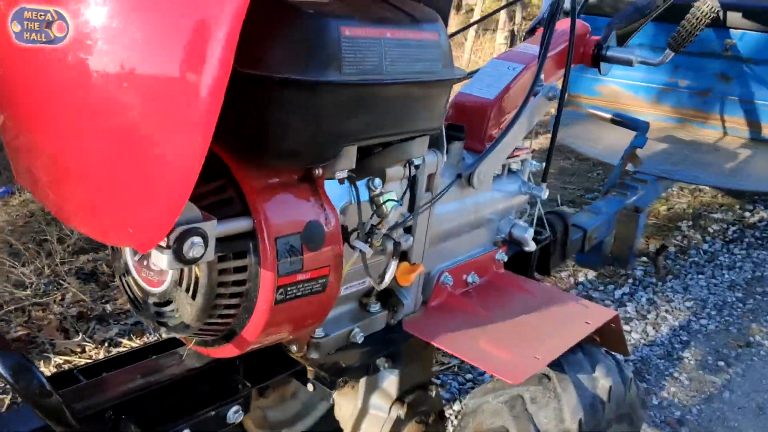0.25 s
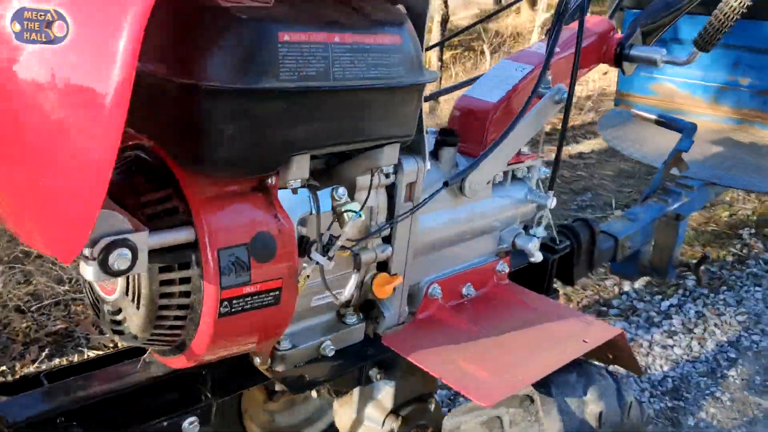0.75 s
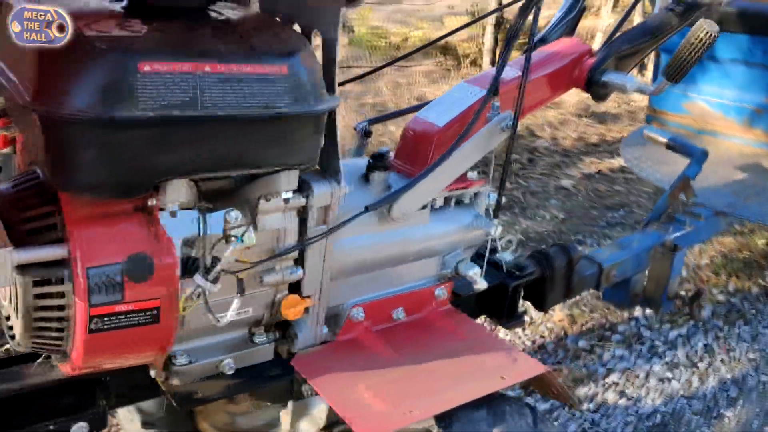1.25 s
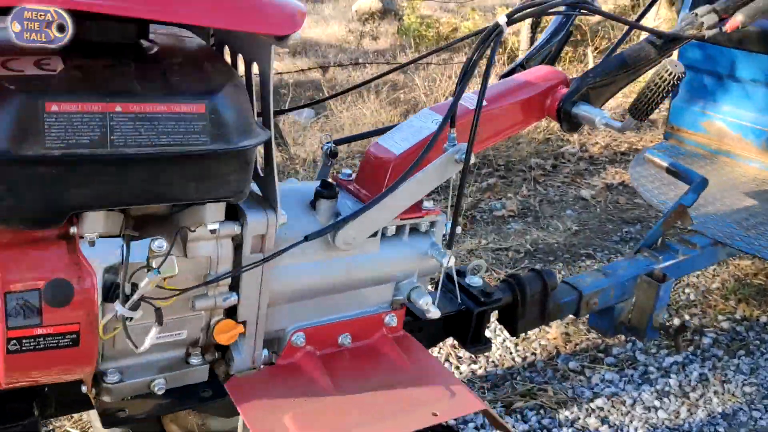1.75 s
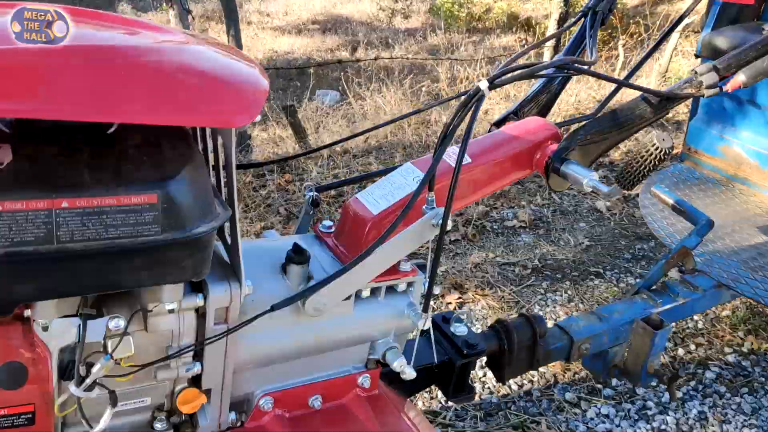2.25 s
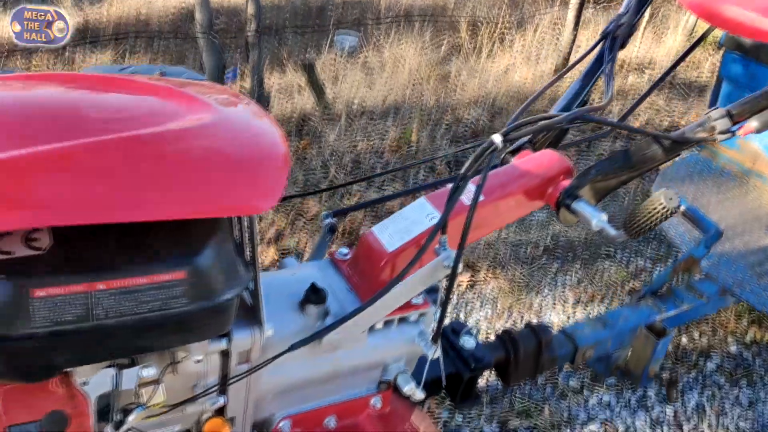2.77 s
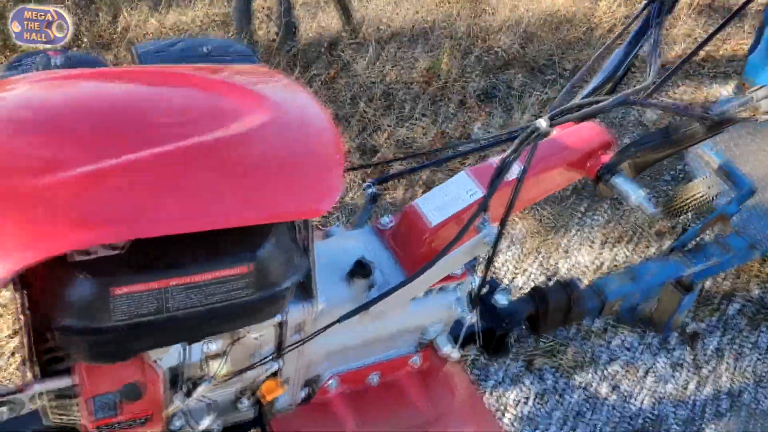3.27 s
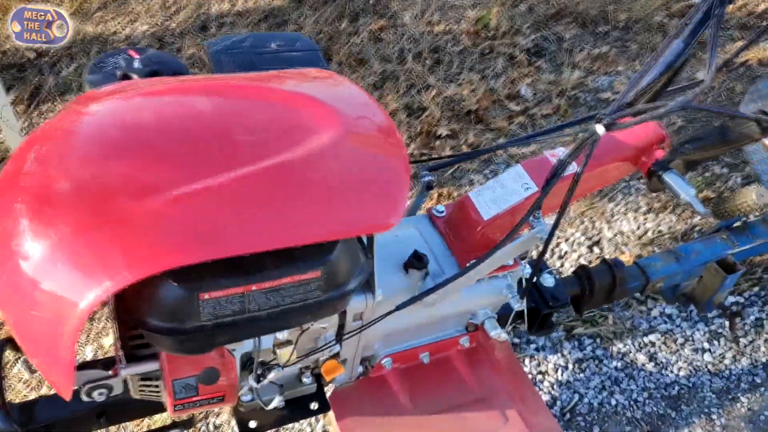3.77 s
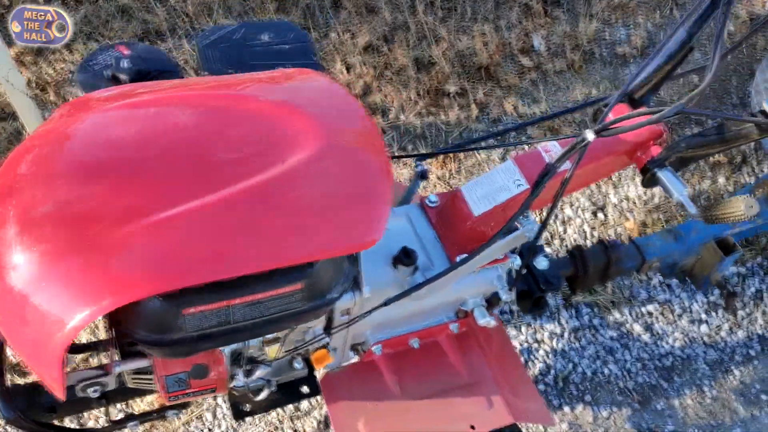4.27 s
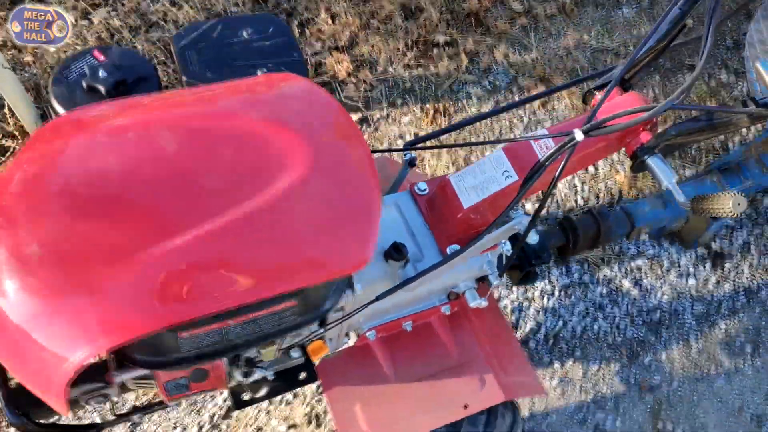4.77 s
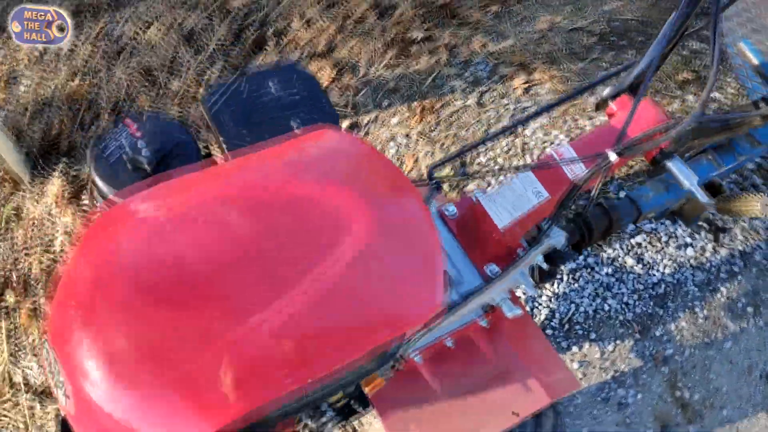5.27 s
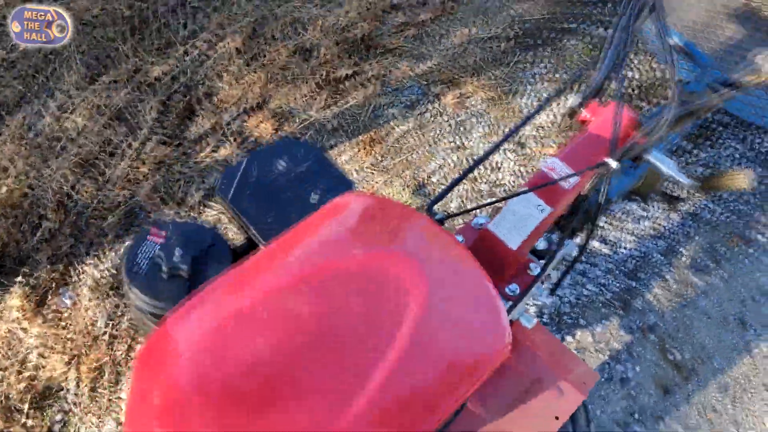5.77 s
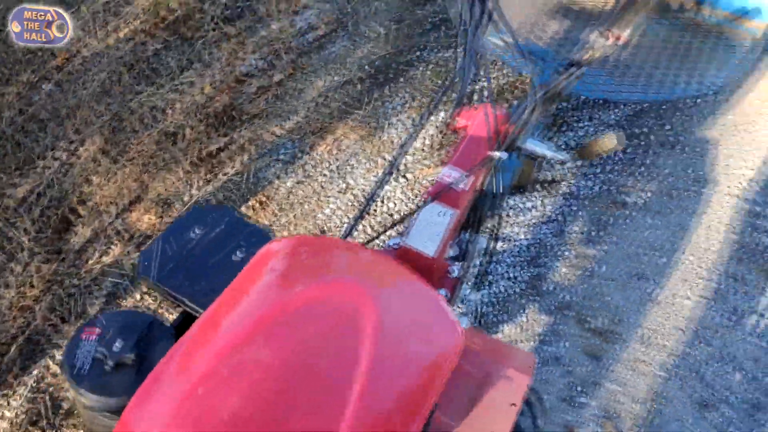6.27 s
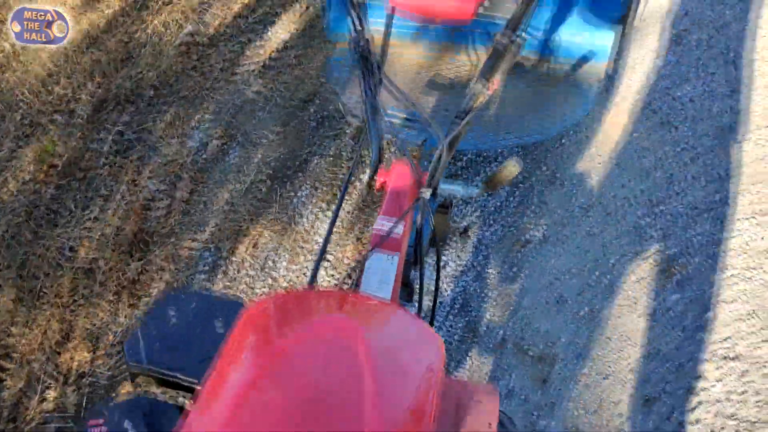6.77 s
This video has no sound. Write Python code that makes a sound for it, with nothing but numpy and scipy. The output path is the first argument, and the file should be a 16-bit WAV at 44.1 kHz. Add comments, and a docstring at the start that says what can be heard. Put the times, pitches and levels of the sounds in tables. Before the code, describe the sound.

Steady fast rattling drone of a single-cylinder engine, its tone shifting as the handheld microphone moves round, with sharp handling ticks, fading at the end.

```python
"""At a roadside, the single-cylinder petrol engine of a walking tiller runs while a hand-held microphone moves round it.
Every turn of the crank repeats a pattern of knocks and clatter, mixed with random rush and the fan's air.
Drone, clatter and fan are coloured by the side of the machine that the microphone faces.
Fingers bump, rub, tick, slide and squeak on the microphone's case: damped swings, short rings and filtered noise.
A light breeze rumbles in its two ports as slow, uneven noise."""
import sys
import numpy as np
from scipy import signal
from scipy.fft import rfft, irfft
from scipy.io import wavfile
from scipy.ndimage import uniform_filter1d, map_coordinates

SR = 44100
rng = np.random.default_rng(int(sys.argv[2]) if len(sys.argv) > 2 else 0)


def materialize(psi):
    """Save the field psi as 16-bit PCM at rate SR to the path in sys.argv[1].

    A 1-D psi becomes a single channel; in a 2-D psi each row is a channel.
    """
    bounded = np.clip(np.atleast_2d(psi).T, -1, 1)
    quanta = np.round(bounded * 32767).astype(np.int16)
    wavfile.write(sys.argv[1], SR, quanta)


N = 309582
TIME = np.arange(N) / SR
PORT_LAG_S = 0.0003633   # shared sound reaches the left port this much later

# speed of the crank before its small wavering: (time [s], speed [turns per s])
CRANK_SPEED = [(0, 69.0), (.5, 68.78), (1.2, 68.94), (2, 69.12), (2.3, 68.72), (2.65, 69.1), (3.6, 69.13),
               (4.2, 69.04), (4.55, 69.17), (5.3, 69.04), (5.9, 68.87), (7.02, 69.05)]
# pitch of the cowl's ring before it wavers: (time [s], frequency [Hz])
COWL_PITCH = [(0, 2627), (.3, 2750), (.7, 2665), (1.4, 2756), (2.3, 2460), (3.0, 2408), (4.4, 2300),
              (6.0, 2290)]
COWL_WAVER_HZ, COWL_WAVERS_PER_S = 35, 14
CHIME_AT = .21   # when the cowl's chime peaks [share of a turn]


def from_db(db):
    """Decibels to gain."""
    return 10 ** (np.asarray(db) / 20)


def read_curve(rows, x):
    """Read a two-column curve at x, with straight lines between its points."""
    return np.interp(x, *np.transpose(rows))


def in_time(rows):
    """Read a curve over time, sample by sample."""
    return read_curve(rows, TIME)


def at_hz(points, hz):
    """Gain of a spectrum at the given frequencies, with straight lines over log frequency."""
    f, db = np.transpose(points)
    return from_db(np.interp(np.log(hz + 1e-9), np.log(f), db))


def rms_one(x):
    """Scale a stereo pair so that the average of its two sides has rms 1."""
    middle = x.mean(axis=0)
    return x / np.sqrt(np.mean(middle ** 2) + 1e-20)


def panned(pan_db):
    """Left and right gains of constant power; a positive value makes the left louder."""
    gains = from_db(np.array([pan_db, -pan_db]).reshape(2, -1) / 2)
    return gains / np.sqrt(np.mean(gains ** 2, axis=0))


def drift(rate):
    """Slow random wandering: straight lines between chance values of spread 1, `rate` of them a second."""
    knots = rng.standard_normal(int(N / SR * rate) + 2)
    return np.interp(TIME * rate, np.arange(len(knots)), knots)


def white():
    """Unrelated noise for each side."""
    return rng.standard_normal((2, N))


def shaped(x, colour, low_hz, high_hz, alike):
    """Colour and band-limit a pair; the part that both ports share reaches the left one later."""
    hz = np.fft.rfftfreq(N, 1 / SR) + 1e-3
    edges = 1 / np.sqrt((1 + (low_hz / hz) ** 20) * (1 + (hz / high_hz) ** 20))
    first, second = rfft(x) * edges * at_hz(colour, hz)
    alike = np.clip(alike, 0, 1)
    left = first * np.exp(-2j * np.pi * hz * PORT_LAG_S)
    right = alike * first + np.sqrt(1 - alike ** 2) * second
    return rms_one(irfft([left, right], N))


def blend(tone, rush, share):
    """Mix two sounds; `share` is the first one's part of the power."""
    share = np.clip(share, 0, 1)
    return np.sqrt(share) * tone + np.sqrt(1 - share) * rush


def narrow_ring(centre_hz, width_hz):
    """Noise in a resonance whose centre moves: slow noise carried up to the moving pitch."""
    lowpass = signal.butter(2, width_hz / 2, fs=SR, output="sos")
    slow = signal.sosfilt(lowpass, white() + 1j * white())
    carrier = np.exp(2j * np.pi * np.cumsum(centre_hz) / SR)
    return rms_one((slow * carrier).real)


def add(out, s, sound, pan_db):
    """Place a short sound at time s; the louder side gets its full height."""
    start = round(s * SR)
    sides = panned(pan_db)
    out[:, start:start + len(sound)] += (sides / sides.max() * sound)[:, :N - start]


def engine():
    """Drone, clatter and fan: the crank's angle times their repeating parts and their puffs."""
    # how clearly the buzz stands out of the rush: (time [s], repeating share of the power [0-1])
    clearness = [(.25, .25), (.5, .84), (1.85, .84), (2.12, .28), (2.36, .36), (2.58, .8), (4.05, .78),
                 (4.4, .74), (4.8, .86), (6.36, .85), (6.62, .2)]
    # clatter, which comes and goes as the cowl hides and bares the engine: (time [s], level [dB])
    clatter_level = [(0.0, -40.5), (0.39, -43.5), (0.62, -38), (0.9, -43.5), (1.04, -37.5), (1.72, -41),
                     (1.9, -49), (1.99, -39), (2.13, -51), (2.25, -44), (2.27, -50), (2.34, -39.5),
                     (3.28, -39.5), (3.64, -44), (3.93, -42.5), (4.07, -45.5), (4.21, -43), (4.36, -41.5),
                     (4.59, -50), (4.79, -42), (5.08, -50), (5.24, -46), (5.41, -48), (5.7, -43.5),
                     (6.05, -40), (6.32, -42), (6.47, -53), (6.61, -50), (6.7, -59), (7.02, -56)]
    # walk round the machine: (time [s], position [0 at the flank, 1 before the cowl, 2 above it])
    walk = [(0, 1.2), (1.0, 0.27), (1.85, 0.14), (2.45, 0.75), (3.5, 0.98), (4.9, 1.4), (5.4, 1.49),
            (5.8, 1.87), (7.02, 1.24)]
    # the pitch wavers more where the buzz is unclear: (clearness [0-1], spread [share of the speed])
    waver_spread = [(.25, .009), (.75, .0003)]
    open_db = -39    # clatter with the engine in plain view
    swell_s = 0.64   # swings of the clatter quicker than this carry the drone along

    speed, clear = in_time(CRANK_SPEED), in_time(clearness)
    clatter_db, position = in_time(clatter_level), in_time(walk)
    waver = read_curve(waver_spread, clear) * drift(9)
    turns = np.cumsum(speed * (1 + 0.00077 * drift(25) + waver)) / SR
    puffs = knocking(turns, decay=0.14, rest=0.3)
    high = buzz(turns, position, alike=.6, steady=1.1, half_db=-12)
    swell_db = clatter_db - uniform_filter1d(clatter_db, size=int(swell_s * SR))
    sound = drone(turns, position, puffs, clear, swell_db)
    sound = sound + clatter(high, turns, puffs, clear, clatter_db, position)
    sound = sound + fan(high, puffs, clear, clatter_db - open_db, position)
    return walk_round(sound, position)


def knocking(angle, decay, rest):
    """Strength of the rattle round one turn: each knock jumps up, then dies away [decay: share of a turn]."""
    # knocks within one turn: (moment [share of the turn], level [dB])
    knock_rows = [(.2, -8), (.46, -10.5), (.7, -11), (.9, -9.5)]
    strength = rest + sum(from_db(db) * np.exp(-((angle - at) % 1) / decay) for at, db in knock_rows)
    return strength / np.sqrt(np.mean(strength ** 2))


def buzz(turns, position, alike, steady, half_db, size=4096, count=22):
    """A rattle repeats every two turns; its fine pattern slowly changes, and some lines depend on position."""
    # lines of the engine: (multiple of crank speed, level [dB])
    line_rows = [(2, -16.5), (3, -15.5), (4, -34), (5, -11), (6, -6.5), (7, -14.5), (8, -13), (9, -17.5),
                 (10, -10), (11, -10), (12, -10.5), (13, -7.5), (14, -3.5), (15, -6.5), (16, -11),
                 (17, -11), (18, -6), (19, 0), (20, 0.5), (21, -3.5), (22, -1.5), (23, -9), (24, -10),
                 (25, -4.5), (26, -4), (27, -3.5), (28, 1), (29, 1.5), (30, 0), (31, -6.5), (32, 1.5),
                 (33, 1.5), (34, -3), (35, 2.5), (36, -3), (37, -0.5), (38, 0), (39, -1), (40, -2),
                 (41, -3), (42, -5.5), (43, -1.5), (44, -9), (45, -13), (46, -6.5), (47, -8), (48, -12),
                 (49, -8), (50, -9.0), (51, -8), (52, -20), (53, -19), (54, -13.5), (55, -8), (56, -13),
                 (57, -15)]
    # lines that beam towards one position or leave it in shadow: (multiple of crank speed, position, level [dB])
    beam_rows = [(3, 1.9, 5), (6, 1.92, 6.5), (9, 1.1, 5), (10, 0.3, 4), (10, 1.45, 4), (10, 2, -26),
                 (11, 0.75, 3), (11, .25, 4), (11, 2.1, -17), (12, 0.95, -5), (13, .5, 4), (13, 0.85, -6),
                 (16, 1.05, 4), (17, 1.65, 7), (19, .55, -4), (20, 1.48, -20), (21, 0.55, 4), (19, 1.2, -4),
                 (22, 0.45, -13), (24, 1.7, 3), (27, .4, 3), (29, 0.48, -10), (30, 1.85, 4), (31, 1.41, 11),
                 (31, 0.56, 3), (34, 1.77, 6), (34, .9, -4), (35, 1.7, -5.5), (36, 1.2, 4.5),
                 (38, 0.31, 4.5), (42, 1.8, 9), (43, 0.18, 2), (43, 0.94, -6.5), (44, 0.12, 4.5),
                 (45, 1.65, 7), (47, 0.43, -1.5), (48, 0.88, 11.5), (54, 0.29, 10), (57, 0.14, 10)]
    beam_width = .22   # spread in steps of position

    order = np.arange(size // 2 + 1) / 2   # a four-stroke cycle lasts two turns
    whole = order % 1 == 0
    multiple, line_db = np.transpose(line_rows)
    spots = position[np.linspace(0, N - 1, count).astype(int), None]
    beams_db = sum(db * (order == round(k)) * np.exp(-((spots - at) / beam_width) ** 2 / 2)
                   for k, at, db in beam_rows)
    lines = from_db(np.interp(order, multiple, line_db) + beams_db + half_db * ~whole)
    lines = lines * (order > 1) * (order < size / 16)
    above = np.maximum(order / multiple[-1], 1)
    lines = lines * from_db(-9 * np.minimum(np.log2(above), .5))

    # one steady grain per side, plus a fresh one for each of the `count` moments
    grain = steady * rng.standard_normal((2, 1, size)) + rng.standard_normal((2, count, size))
    grain[1] = alike * grain[0] + np.sqrt(max(1 - alike ** 2, 0)) * grain[1]
    partials = rfft(grain * knocking(2 * np.arange(size) / size, decay=0.07, rest=0.3))
    strength = np.where(above > 1, partials.std(), np.abs(partials))   # the highest lines vary by chance
    cycles = irfft(partials / strength * lines)

    # play the cycles with the crank, fading from each moment to the next
    place = TIME / TIME[-1] * (count - 1)
    phase = turns / 2 % 1 * (size - 1)
    return np.array([map_coordinates(c, [place, phase], order=1) for c in cycles])


def drone(turns, position, puffs, clear, swell_db):
    """Muffler and crankcase: the low lines of the engine over a puffing rush."""
    # drone, falling at the end as the microphone draws away: (time [s], level [dB])
    drone_level = [(0, -54), (1.6, -49), (2.15, -52), (3.0, -53), (6.25, -52.5), (6.72, -60.5)]
    # colour of the low rush: (frequency [Hz], density [dB per Hz])
    rush_colour = [(90, 0), (160, -6), (280, -1.5), (420, -1.5), (560, 0.5), (750, -2), (1000, 2),
                   (1400, 8), (1800, 2.5)]
    tone_colour = [(130, -0.73), (420, -0.37), (700, -0.74), (830, 1.7), (970, 1.5),
                   (1100, -0.42), (1800, -1.0)]   # (frequency [Hz], level [dB])
    swell_share = 0.22   # part of the clatter's quick swings [dB per dB]
    low = buzz(turns, position, alike=0.95, steady=2.2, half_db=-30)
    tone = shaped(low, tone_colour, 127, 1840, alike=0)
    rush = shaped(white() * puffs, rush_colour, 71, 2310, alike=0.68)
    level = from_db(in_time(drone_level) + swell_share * swell_db)
    return level * blend(tone, rush, clear) * panned(2.5)


def clatter(high, turns, puffs, clear, clatter_db, position):
    """Valve gear and cooling fins rattle, while the thin cowl rings on and chimes once a turn."""
    # colour of the random rattle: (frequency [Hz], density [dB per Hz])
    rush_colour = [(1700, -8.5), (2000, -5), (2300, -1), (2600, -2.5), (3000, -6), (3500, -7.5),
                   (4300, -10.5)]
    # unbroken ring of the cowl where the buzz is unclear: (clearness [0-1], share of the power [0-1])
    ring_curve = [(.25, .38), (.7, .12), (.85, 0)]
    # chime, before clearness scales its share: (position, share of the power [0-1])
    chime_curve = [(.3, .15), (.55, .3), (.9, .14), (1.48, .2), (1.66, .55)]
    # side at the flank, before the cowl and above it: (left over right [dB])
    side_db = [15.5, 10.5, 7]
    tone_colour = [(1900, -0.5), (2350, 1.5), (2800, 1.3), (3300, -0.1), (4200, 0.5)]   # (frequency [Hz], level [dB])
    throb_below_hz = 2750

    tone = shaped(high, tone_colour, 2075, 3980, alike=0)
    rush = shaped(white() * puffs, rush_colour, 1550, 4500, alike=0.41)
    rattle = blend(tone, rush, clear)

    # only the cowl's range swells
    cowl = signal.sosfiltfilt(signal.butter(6, throb_below_hz, fs=SR, output="sos"), rattle)
    depth_db = np.interp(position, [1.48, 1.66], [.5, 3.2]) * clear
    rattle = rattle + cowl * (throb(turns, depth_db) - 1)

    ring_hz = in_time(COWL_PITCH) + 2 * COWL_WAVER_HZ * drift(COWL_WAVERS_PER_S)
    ring = narrow_ring(ring_hz, width_hz=240)
    ring_share = read_curve(ring_curve, clear) * np.interp(clatter_db, [-52, -44], [.1, 1])
    rattle = blend(ring, rattle, ring_share)
    rattle = blend(chime(turns), rattle, clear * read_curve(chime_curve, position))
    return from_db(clatter_db) * rattle * panned(np.interp(position, range(len(side_db)), side_db))


def throb(turns, depth_db):
    """A swell once a turn that peaks with the chime, kept at an even average power."""
    swell = from_db(depth_db * np.cos(2 * np.pi * (turns - CHIME_AT)))
    return swell / np.sqrt(uniform_filter1d(swell ** 2, size=2560))


def chime(turns, uneven_db=2.5):
    """Once a turn the cowl gives a short, rising ring, nearly the same each time."""
    width, rise_hz_per_turn = .14, 1300   # width is the spread as a share of the turn
    angle = (turns - CHIME_AT + .5) % 1 - .5
    hz = in_time(COWL_PITCH) + COWL_WAVER_HZ * drift(COWL_WAVERS_PER_S)
    cycles = (hz + rise_hz_per_turn * angle / 2) * angle / in_time(CRANK_SPEED)
    envelope = np.exp(-(angle / width) ** 2 / 2) * from_db(uneven_db * drift(70))
    ring = np.sin(2 * np.pi * cycles) * envelope
    late = np.interp(TIME - PORT_LAG_S, TIME, ring)
    return rms_one(np.array([late, ring]))


def fan(high, puffs, clear, shade_db, position, flutter_db=1.5):
    """The fan's air is mostly random; it dims with the clatter, and its fine hiss fades away from the flank."""
    # colour of the moving air: (frequency [Hz], density [dB per Hz])
    air_colour = [(4000, 15.5), (5000, 7), (6000, 4.5), (7000, 3.5), (8000, 6), (9000, -1), (11000, -4),
                  (13000, -7), (15500, -10.5)]
    # side at the flank, before the cowl and above it: (left over right [dB])
    side_db = [1.5, -0.3, -2]
    # level in plain view [dB], and share of the clatter's swing that it follows
    rush_db, rush_follows = -56.5, 0.57
    hiss_db, hiss_follows = -46, 0.35
    hiss_loss_db = 4.5   # per step of position away from the flank

    tone = shaped(high, air_colour, 4800, 6300, alike=0)
    air = shaped(white() * puffs, air_colour, 4500, 6700, alike=0.11)
    rush = from_db(rush_db + rush_follows * shade_db) * blend(tone, air, clear * 0.48)

    tone = shaped(high, air_colour, 6300, 17000, alike=0)
    air = shaped(white(), air_colour, 6420, 14900, alike=0.02)
    hiss_level = from_db(hiss_db + hiss_follows * shade_db - hiss_loss_db * position)
    hiss = hiss_level * blend(tone, air, clear * 0.057)
    flutter = from_db(flutter_db * drift(20))
    return (rush + hiss) * flutter * panned(np.interp(position, range(len(side_db)), side_db))


def walk_round(x, position):
    """The colour of the engine passes from one side's to the next as the microphone moves."""
    # how the engine radiates to the flank, before the cowl and above it: (frequency [Hz], level [dB])
    flank = [(130, 6), (210, -8), (450, -7.5), (690, -10.5), (1000, -7), (1110, 4), (1400, 2), (2000, -5),
             (2700, 0), (3800, 5), (6000, -1.5), (14000, -1)]
    front = [(130, 8), (450, -5), (620, 3), (760, 8), (1000, 4.5), (1310, 2), (1900, 0.5), (2500, -1),
             (3400, 2), (5000, 1), (8000, 1.5), (14000, 1.5)]
    overhead = [(130, -1), (210, 2), (440, 2), (750, -4), (1000, -4), (1400, 4), (2300, -0.5), (3100, 0),
                (4600, 7), (5700, 0.5), (8500, -4.5), (14000, 5.5)]
    hz, spectrum = np.fft.rfftfreq(N, 1 / SR), rfft(x)
    out = 0
    for k, side in enumerate((flank, front, overhead)):
        weight = np.maximum(1 - np.abs(np.clip(position, 0, 2) - k), 0)
        out = out + weight * irfft(spectrum * at_hz(side, hz), N)
    return out


def breeze(gust_db=0.5):
    """Wind makes a lumpy rumble, with gusts of its own in each port."""
    # breeze, freshening at the end: (time [s], level [dB])
    wind_level = [(0, -56), (1.0, -61.5), (3.0, -59.5), (6.3, -55.5), (7.02, -49)]
    # colour of the rumble: (frequency [Hz], density [dB per Hz])
    wind_colour = [(12, 16), (25, -13.5), (45, 4.5), (80, -5.5), (150, -12), (300, -17)]
    gusts = from_db(gust_db * np.array([drift(8.6), drift(13.0)]))
    rumble = shaped(white(), wind_colour, 10.3, 780, alike=0.42)
    return from_db(in_time(wind_level)) * gusts * rumble


def slide(grain_db=1.5):
    """Skin sticks and slips on the case: a grainy hiss that rises quickly, holds and fades."""
    # slides: (time at full strength [s], level [dB], hold [s], fade [dB per s])
    slide_rows = [(0.01, -53, .1, 150), (0.173, -44.5, 0.016, 140), (1.519, -37, 0.0014, 520),
                  (2.445, -45.5, 0.012, 87), (4.205, -31.5, 0.036, 41.5), (6.57, -54.5, 0.012, 200),
                  (7.01, -50.5, .01, 280)]
    # colour of the hiss: (frequency [Hz], density [dB per Hz])
    skin_colour = [(1900, 3), (2400, 2), (3000, -12.5), (3680, -12), (4000, -9.5), (5210, -1), (6050, -5),
                   (6320, 1), (7770, 4), (8260, -0.5), (9070, -3.5), (15500, -29.5)]
    level = 0
    for s, db, hold_s, fade in slide_rows:
        rise_db = (600 + 2 * fade) * np.minimum(TIME - s, 0)   # a slide that fades faster also rises faster
        fade_db = fade * np.maximum(TIME - s - hold_s, 0)
        level = level + from_db(db + rise_db - fade_db)
    friction = white() * from_db(grain_db * drift(900))
    return level * shaped(friction, skin_colour, 2350, 15000, alike=0.19) * panned(2.4)


def bumps(cycles=0.61, sag=0.3, sag_hz=45, sag_s=0.014, crack_db=-13, crack_hz=1100, crack_s=0.0016):
    """A bump is a brief crack, a few damped swings, each slower than the last, and a slow sag of pressure."""
    # soft bumps on the case: (time [s], peak of the swings [dB], half the starting pitch [Hz], left over right [dB])
    bump_rows = [(.184, -28, 925, 25), (.187, -30.5, 175, 31), (0.346, -32.5, 158, 25),
                 (.581, -27, 344, 36), (1.395, -41, 312, 17), (1.475, -32.5, 137.2, 16),
                 (2.368, -38.5, 223, 22), (2.702, -35.5, 312, 14), (2.979, -35.5, 262.4, 16),
                 (3.196, -35.5, 282, -25), (3.233, -38, 139.8, -23), (3.452, -34, 239.7, -27),
                 (3.857, -25.5, 304, 26), (4.038, -37, 404, 13), (4.454, -27.5, 208.5, 22),
                 (4.503, -27.5, 180, 28), (4.7874, -24, 895, 37), (4.788, -19.5, 223, 30),
                 (4.944, -34.5, 227, 18), (5.218, -18.5, 900, -29), (6.621, -32, 172, 18),
                 (6.633, -32.5, 1236, 21), (6.7545, -24.5, 317, 17), (6.701, -42, 420, 12),
                 (6.916, -39, 200, 24), (6.927, -39, 1650, -4)]
    out, t = np.zeros((2, N)), TIME[:SR // 10]
    slow = np.sin(2 * np.pi * sag_hz * t) * np.exp(-t / sag_s)
    crack = from_db(crack_db) * np.sin(2 * np.pi * crack_hz * t) * np.exp(-t / crack_s)
    for s, db, half_hz, pan_db in bump_rows:
        # the logarithm in the phase makes the pitch fall from its start
        swing = np.sin(2 * np.pi * np.log1p(2 * half_hz * t)) * np.sqrt(t) * np.exp(-t * half_hz / cycles)
        bump = crack + swing / np.abs(swing).max() + sag * slow
        add(out, s, from_db(db) * bump, pan_db)
    return out


def rubs(width=0.85):
    """Skin dragged over the case gives a short, ragged, dull scuff: noise in a band that swells and fades."""
    # the palm shifts: (middle [s], level [dB], spread in time [s], pitch [Hz], left over right [dB])
    rub_rows = [(.607, -49, 0.0091, 129, 15), (1.425, -50, 0.024, 109, 12), (1.533, -50, 0.0087, 200, -2),
                (1.532, -48, 0.023, 980, 7), (3.09, -49, 0.0072, 270, 10), (3.301, -46, 0.0041, 296, -24),
                (3.904, -55, 0.018, 248, 12), (4.05, -51, 0.0037, 516, 0), (4.188, -47, 0.0066, 128.4, 2),
                (4.574, -46, 0.026, 262, 22), (5.865, -56.5, .09, 450, 3), (6.694, -56, 0.017, 500, 10),
                (6.861, -52, 0.012, 330, 10)]
    out, t = np.zeros((2, N)), TIME[:SR // 3]
    middle = t[-1] / 2
    for s, db, length_s, hz, pan_db in rub_rows:
        edges_hz = [hz / (1 + width / 2), hz * (1 + width / 2)]
        band = signal.butter(2, edges_hz, "band", fs=SR, output="sos")
        scuff = signal.sosfilt(band, rng.standard_normal(len(t)))
        envelope = np.exp(-((t - middle) / length_s) ** 2 / 2)
        add(out, s - middle, from_db(db) * scuff / scuff.std() * envelope, pan_db)
    return out


def ticks(snap_s=0.00063):
    """A hard touch gives a dry, bright snap and rings the small modes of the case for a few milliseconds."""
    # sharp ticks: (time [s], peak [dB], left over right [dB], dry snap beside the ring [dB])
    tick_rows = [(1.52, -14, -17, -12), (1.53, -33, 0, -14), (3.856, -22, 18, -15), (4.143, -19.5, 17, -16),
                 (4.787, -15.5, 27, -8), (5.2186, -4, -36, -11), (5.537, -30, -9, -27),
                 (5.737, -29, -7, -25), (6.584, -24, -16, -19), (6.5878, -21, -13, -19),
                 (6.5944, -24, -18, -19), (6.599, -19, -19, -24), (6.6222, -21.5, 15, 4)]
    # ring of the case, before small chance changes: (frequency [Hz], level [dB], time to fall by 60 dB [s])
    case_modes = [(1450, 14, 0.0028), (7370, 25, 0.0035), (8100, 12, 0.0013)]
    out, t = np.zeros((2, N)), TIME[:SR // 50]
    for s, db, pan_db, snap_db in tick_rows:
        ring = sum(from_db(level + rng.normal() - 60 * t / t60) * np.sin(2 * np.pi * hz * t)
                   for hz, level, t60 in case_modes)
        # differences between neighbouring samples make the noise bright
        snap = np.diff(rng.standard_normal(len(t)) * np.exp(-t / snap_s), prepend=0)
        tick = ring / np.abs(ring).max() + from_db(snap_db) * snap / np.abs(snap).max()
        add(out, s, from_db(db) * tick / np.abs(tick).max(), pan_db)
    return out


def squeak(at_s=6.83, spread_s=0.06, level_db=-56, middle_hz=12600, fall_hz=600):
    """A faint, very high squeak of skin on the case: a band of noise falling in pitch."""
    progress = (TIME - at_s) / spread_s
    envelope = np.exp(-progress ** 2 / 2)
    centre_hz = middle_hz - fall_hz * np.tanh(progress)
    return from_db(level_db) * envelope * narrow_ring(centre_hz, width_hz=2900)


def scene():
    """The engine in the open air, with the handling and wind at the microphone."""
    return engine() + breeze() + slide() + bumps() + rubs() + ticks() + squeak()


def record(dry):
    """The top is cut steeply above 15.9 kHz."""
    return signal.sosfilt(signal.ellip(10, .1, 80, 15900, fs=SR, output="sos"), dry)


dry = scene()
out = record(dry)
materialize(out)
```